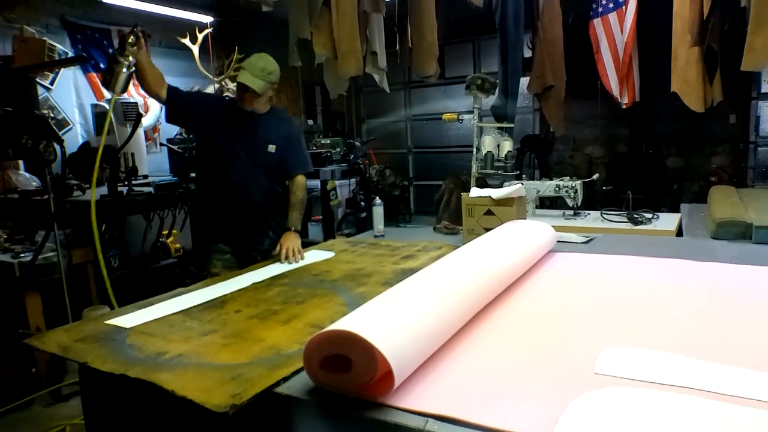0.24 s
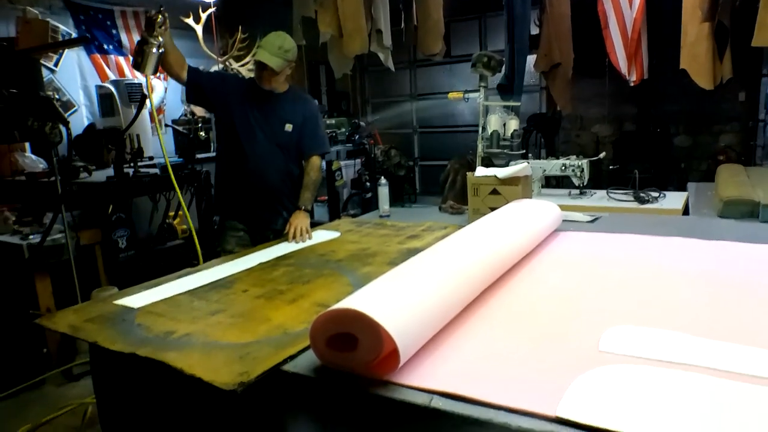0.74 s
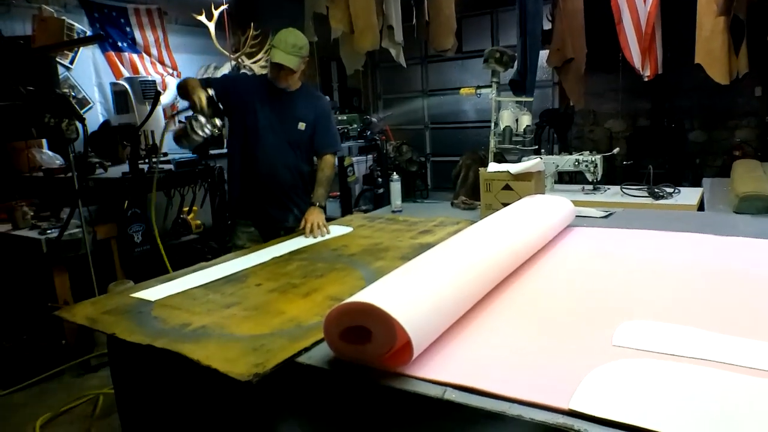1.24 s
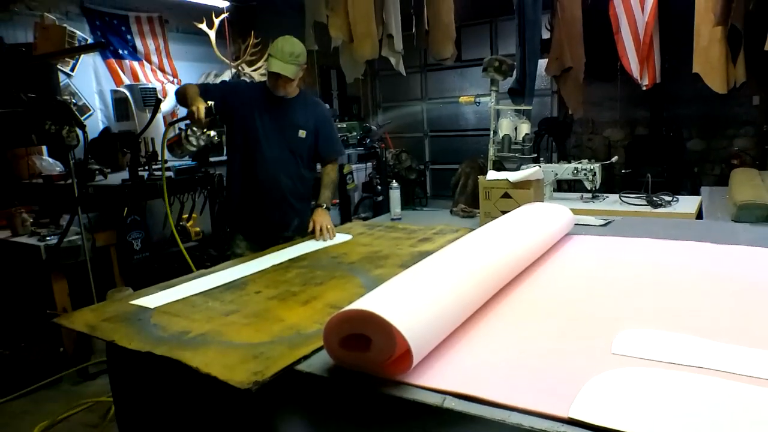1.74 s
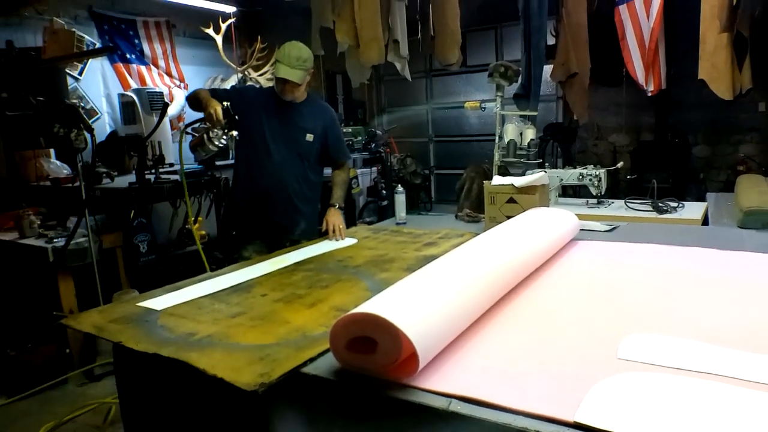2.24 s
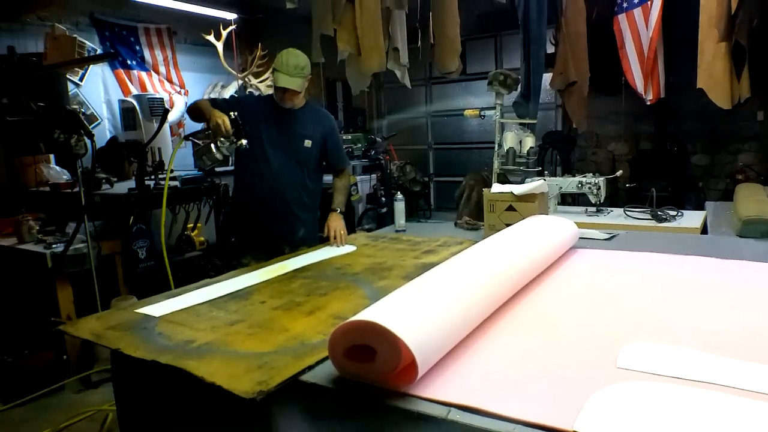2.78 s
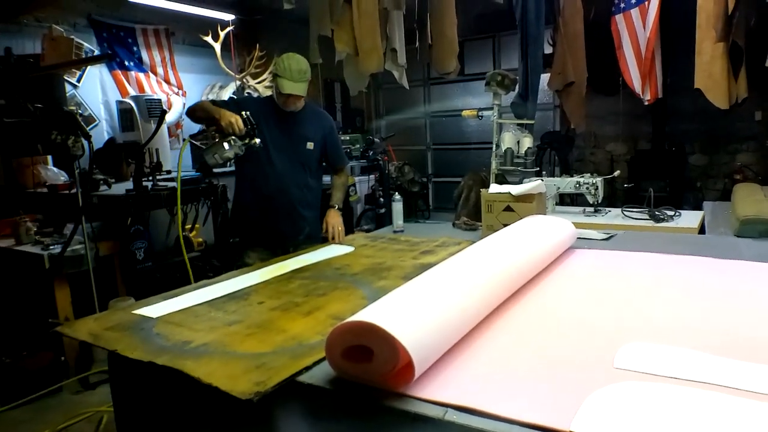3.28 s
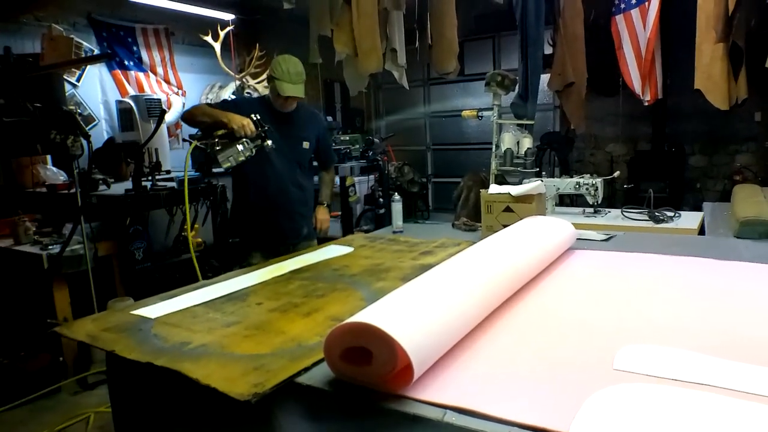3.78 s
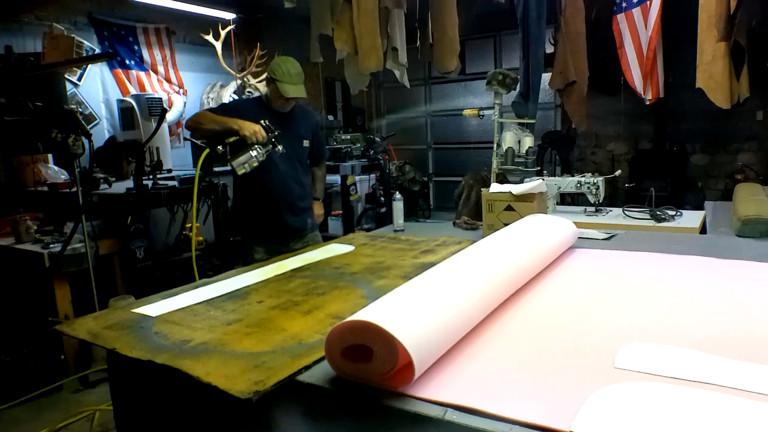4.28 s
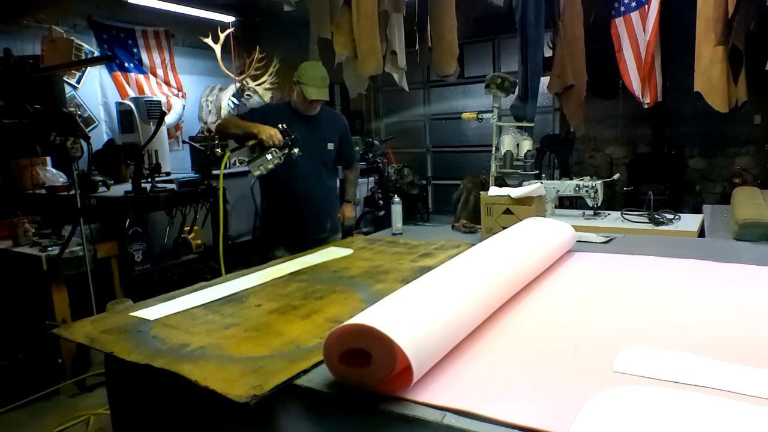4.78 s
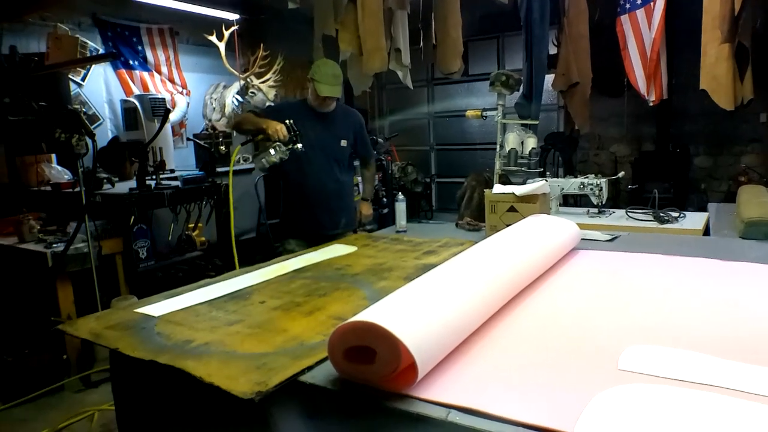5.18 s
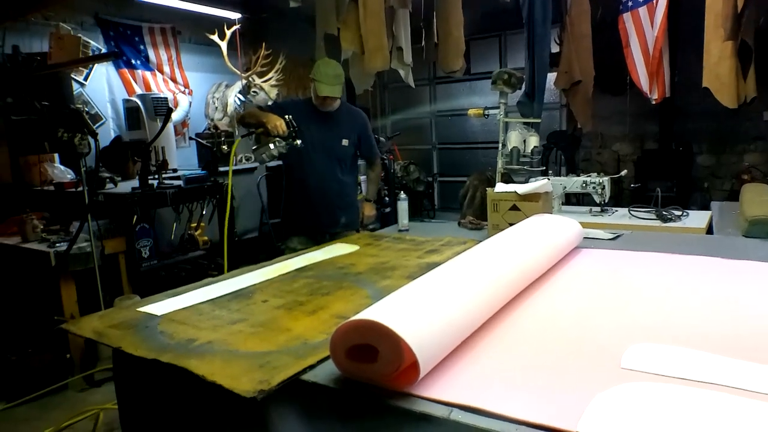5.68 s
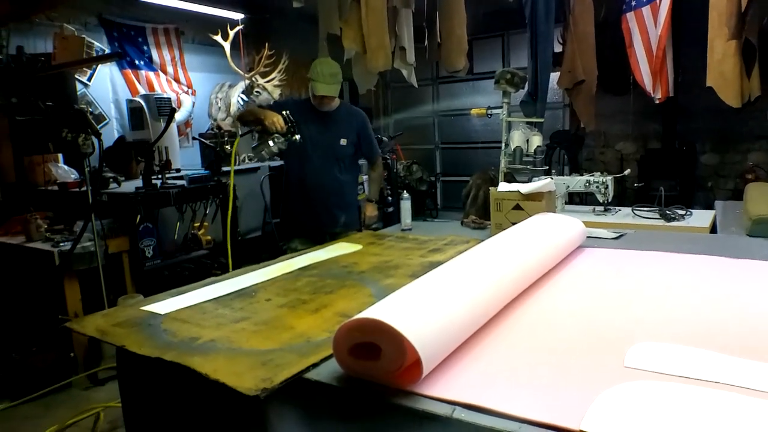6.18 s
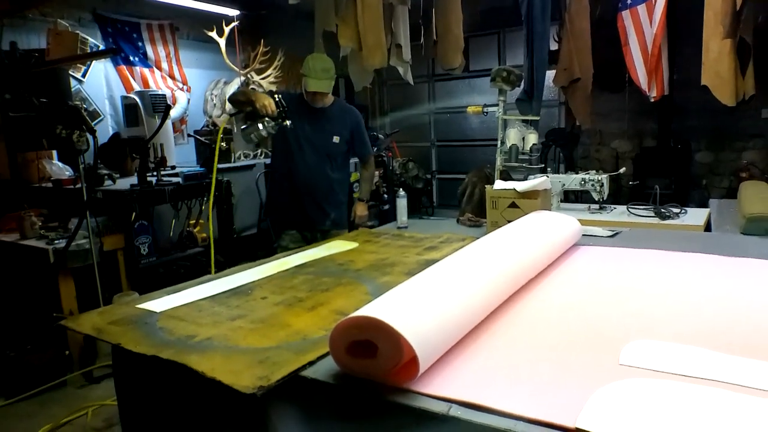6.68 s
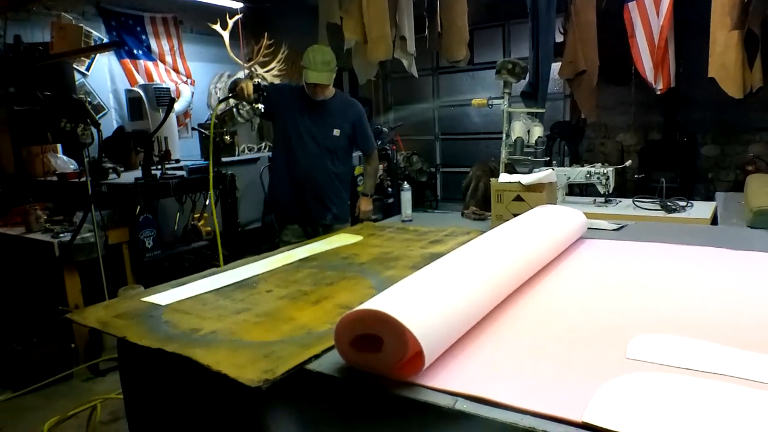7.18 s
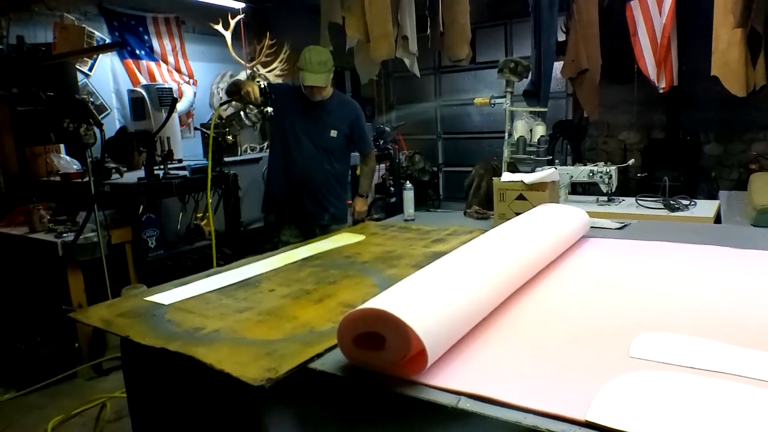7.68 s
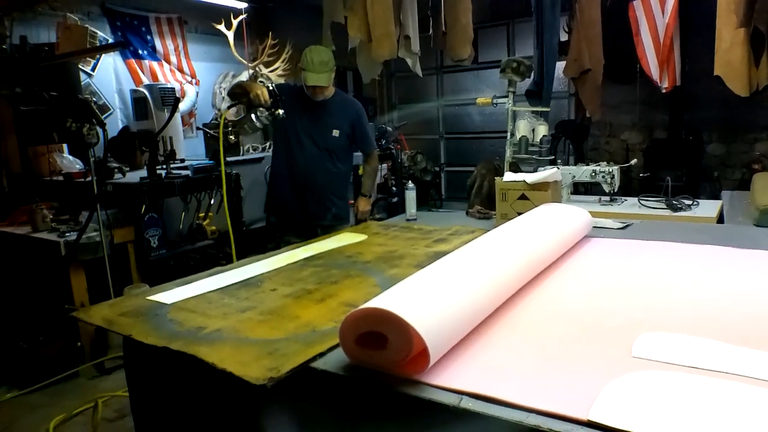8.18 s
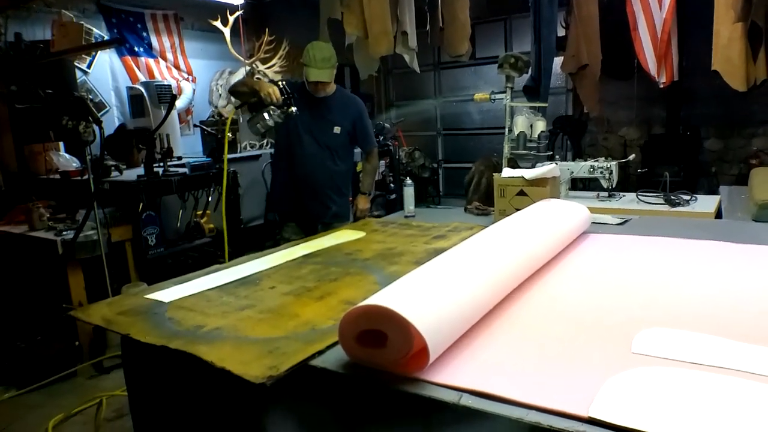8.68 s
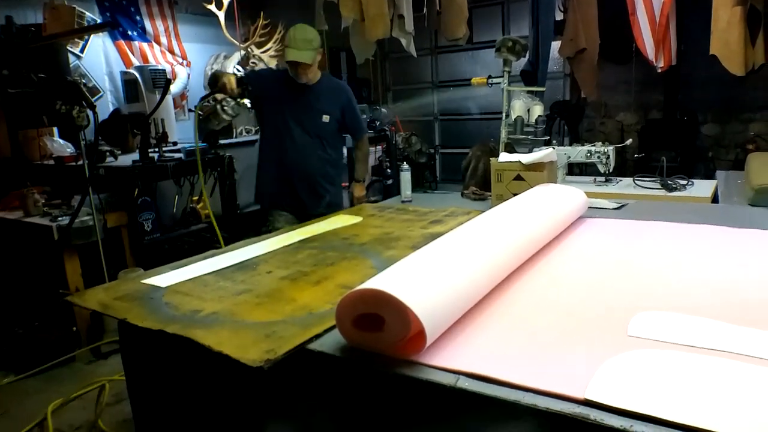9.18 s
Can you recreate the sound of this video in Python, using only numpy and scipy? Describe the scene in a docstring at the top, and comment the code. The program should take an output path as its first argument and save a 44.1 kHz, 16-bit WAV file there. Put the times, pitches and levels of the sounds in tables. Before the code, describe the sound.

A spray gun hisses loudly and steadily over a workbench, following a short stretch of low ventilation hum.

```python
"""A workshop, at the bench, where a compressed-air gun sprays glue along a strip. At first there is only
the ventilation, a low draught and faint handling. Then the nozzle hisses and the jet roars on the bench,
fading off its far end, while nearby surfaces comb the sound as the gun moves and stirred air rumbles.
One small microphone in a resonant housing, within reach of the gusts, is driven to the edge of overload.
The sound has a few brief dropouts, in which thin electronic tones ring."""
import sys
import numpy as np
from scipy import signal
from scipy.fft import rfft, irfft, next_fast_len
from scipy.io import wavfile
from scipy.ndimage import uniform_filter1d, minimum_filter1d

SR = 44100
rng = np.random.default_rng(int(sys.argv[2]) if len(sys.argv) > 2 else 0)


def wrap_up_sound(samples):
    """Save the sound to the file named by the first command line argument, as 16-bit audio."""
    columns = np.atleast_2d(samples).T
    # keep every value between -1 and 1, then stretch to whole-number steps
    tamed = np.clip(columns, -1, 1)
    steps = np.round(tamed * 32767).astype(np.int16)
    wavfile.write(sys.argv[1], SR, steps)


N = 416039
T = np.arange(N) / SR
OPENS_S, OPENING_S = 1.303, .026  # the valve

# Room tone, and the draught on the microphone. Each row: frequency in Hz, relative level in dB.
ROOM_SPECTRUM = [(30, -7), (58, -3), (75, -6), (110, 1.5), (145, 2.5), (215, 3), (270, -6), (380, -16),
                 (620, -18.5), (1050, -23.5), (1400, -33), (2100, -37), (2600, -33), (3300, -41),
                 (12000, -43)]
DRAUGHT_SPECTRUM = [(8, -5), (22, 1), (38, -1), (50, 3), (60, -4), (80, -14.5), (130, -20), (400, -63),
                    (3000, -100)]
# Ventilation hum. Each row: frequency in Hz, level in dB.
FAN_TONES = [(59.2, -59.5), (145.3, -60), (619.1, -83), (796.7, -86)]
# Gusts that reach the microphone. Each row: centre in seconds, half length in seconds, lift in dB.
MIC_GUSTS = [(1.34, 0.03, 16), (3.17, 0.11, 8), (5.95, 0.076, 4), (6.97, 0.027, 14), (8.35, 0.054, 8),
             (8.8, 0.24, 7.5)]
# Rubs and bumps of gun and hose. Each row: centre and half length in seconds, pitch and bandwidth
# in Hz, level in dB.
RUBS = [(.005, .015, 2400, 3000, -64), (.11, .02, 6900, 600, -79), (.24, .04, 1200, 1500, -74),
        (.46, .08, 2500, 4000, -76), (.69, .025, 7000, 700, -79), (.72, .025, 1650, 350, -73),
        (3.35, 0.01, 383, 170, -28.5)]
# The jet on the bench, from low to high. Each row: frequency in Hz, relative level in dB.
DRONE_SPECTRUM = [(25, -19), (60, -4), (90, -7.5), (115, -10.5), (145, -5), (200, -0.5), (245, -8),
                  (280, -24), (450, -11), (2000, -70)]
ROAR_SPECTRUM = [(120, -26), (240, -8), (340, -9), (560, -3.5), (750, 6), (1200, -65), (4000, -60)]
RUSH_SPECTRUM = [(100, -35), (500, -20), (700, -10.5), (830, 1.5), (1300, 1.5), (1900, 1.5), (2400, -4),
                 (4000, -38), (12000, -60)]
# Brief surges of the drone. Each row: centre in seconds, half length in seconds, lift in dB.
DRONE_SURGES = [(1.97, 0.034, 12), (3.68, 0.045, 5)]
# The roar fades off the bench's far end; the rush holds until the jet leaves the edge.
# Each row: time in seconds, relative level in dB.
ROAR_CURVE = [(1.33, -42.0), (1.5, -37.0), (3.35, -36.5), (3.6, -37.5), (5.9, -36), (6.3, -42),
              (6.6, -36.5), (6.9, -45.5), (7.15, -41), (7.5, -50), (7.95, -42), (8.15, -58), (8.55, -44),
              (8.7, -54), (9.42, -42)]
RUSH_CURVE = [(1.33, -26), (1.5, -23), (2.45, -21.5), (3.4, -21.5), (4.4, -23.5), (5.1, -22), (6.35, -25.5),
              (6.6, -19.5), (6.9, -25), (8.0, -23), (8.12, -34.5), (8.3, -28.5), (8.6, -24), (8.75, -34.5),
              (9.42, -28)]
# Resonances of the bench with its surroundings, and of the microphone's housing.
# Each row: centre in Hz, width in Hz, lift in dB.
BENCH_MODES = [(169, 8.1, 1.5), (224, 12, 4.5), (365, 33, 6.5), (453.4, 18, 10.5), (537, 20, 8.5),
               (832, 49, 4.5), (1020, 36, 9.5), (1161, 67, 6.5), (1353, 47, 2.5), (1593, 37, 8)]
HOUSING_MODES = [(937, 24, 22), (1194, 20, 19.5), (1610, 300, 14.5), (2387, 460, 5.5), (2460, 58, 3),
                 (2650, 240, 4), (3530, 350, 4), (3990, 350, -3), (5100, 250, 1.5), (5240, 140, 2),
                 (7310, 120, 6), (7830, 300, 6.5), (9830, 190, 8.5), (9900, 140, -5.5)]
# The free jet at the nozzle, from low to high. Each row: frequency in Hz, relative level in dB.
BODY_SPECTRUM = [(200, -50), (650, -47), (900, -29.5), (1400, -13.5), (1750, -15), (2200, -1.5),
                 (2850, 0.5), (3150, -9.5), (3700, -3), (4400, -21), (8000, -50)]
HISS_SPECTRUM = [(1500, -51), (3000, -8.5), (3900, -7.5), (4350, 1.5), (5400, -0.5), (5700, 0), (6900, -1),
                 (7900, -2), (8300, -5.5), (9000, -17.5), (11000, -10.5), (12000, -67)]
SIZZLE_SPECTRUM = [(6000, -23), (8800, 4.5), (9600, 4.5), (10750, 9.5), (11300, -11), (13000, -40)]
# The free jet's colour turns with the gun. Each row: time in seconds, relative level in dB.
BODY_CURVE = [(1.33, -23), (1.5, -19.5), (3.2, -17), (3.65, -21), (5.0, -20.5), (7.0, -19), (7.5, -16.5),
              (8.0, -18.5), (8.15, -21.0), (8.4, -17.5), (9.42, -20.0)]
SIZZLE_CURVE = [(1.33, -20.5), (1.7, -21.0), (2.5, -20.0), (4.3, -23), (6.2, -22.5), (7.0, -22),
                (7.25, -17.5), (7.55, -22.5), (7.8, -19), (8.1, -22.5), (9.0, -21.0), (9.3, -18.0)]
# Brief dropouts in the sound. Each row: centre and half length in seconds, depth in dB.
DROPOUTS = [(1.756, .013, -26), (1.873, .005, -13), (1.915, .005, -11), (2.535, .006, -13),
            (3.067, .006, -13), (4.304, .007, -15), (5.605, .007, -15), (8.102, .007, -13)]
# Thin electronic tones that ring in a dropout. Each row: frequency in Hz, relative level in dB.
DROPOUT_TONES = [(1080, -14.5), (2450, 3), (2740, -3.5), (4400, 2.5), (5150, 8), (5660, -4), (6480, -20),
                 (7100, 0.5), (7790, 6), (9800, -2)]


def undb(db):
    """Decibels to gain."""
    return 10 ** (np.asarray(db) / 20)


def unit(x):
    """Scale to rms 1."""
    return x / np.std(x)


def curve(table):
    """A table's levels, joined by straight lines in time."""
    times, db = np.transpose(table)
    return np.interp(T, np.sort(times), db)


def swell(s, half):
    """A smooth rise and fall around time s, top 1."""
    return np.exp(-((T - s) / half) ** 2 / 2)


def lifts(table):
    """The dB that a table of swells adds over time."""
    return sum(db * swell(s, half) for s, half, db in table)


def walk(rate):
    """Random levels held 1 / rate seconds and smoothed twice; spread 1."""
    hold = int(SR / rate)
    held = np.repeat(rng.standard_normal(1024), hold)[:N]
    return unit(uniform_filter1d(uniform_filter1d(held, hold), hold))


def noise(spectrum, peaks=()):
    """Turbulence with a smooth spectrum, lifted at each resonance; rms 1."""
    size = next_fast_len(N, True)
    hz = np.maximum(np.arange(size // 2 + 1) * SR / size, 1)
    points, db = np.transpose(spectrum)
    shape_db = np.interp(np.log(hz), np.log(points), db)
    for centre, width, lift in peaks:
        shape_db += lift / (1 + (2 * (hz - centre) / width) ** 2)
    white = rfft(rng.standard_normal(size))
    return unit(irfft(white * undb(shape_db), size)[:N])


def lowpass(x, hz):
    """A steep cut of the top."""
    return signal.sosfilt(signal.ellip(10, .2, 70, hz, fs=SR, output="sos"), x)


def reflections(x, gain, shortest_s, longest_s, sway_s, count):
    """Echoes off bench and clutter; their paths change as the gun moves, so the comb slides."""
    out = x
    for lag in np.geomspace(shortest_s, longest_s, count):
        out = out + gain * np.interp(T - lag - sway_s * walk(.7), T, x)
    return out / np.sqrt(1 + count * gain ** 2)


def ventilation(room_db=-53, waver_db=2.5, drift_rad=.49, fade_end_s=.73, fade_s=.2):
    """Room tone: air noise and wavering fan tones, one of which dies away before the spraying."""
    def tone(hz, db):
        level = np.sqrt(2) * undb(db + waver_db * walk(4.5))
        return level * np.sin(2 * np.pi * hz * T + drift_rad * walk(6.6))
    fading = tone(hz=619, db=-73) * np.clip((fade_end_s - T) / fade_s, 0, 1)
    air = noise(ROOM_SPECTRUM) * undb(room_db)
    return air + sum(tone(hz, db) for hz, db in FAN_TONES) + fading


def draught(still_db=-50.5, stirred_db=-51, build_db_per_s=1.13, puff_db=4):
    """Air rumbles on the microphone in puffs and gusts, building for as long as the gun blows."""
    db = np.where(T < OPENS_S, still_db, stirred_db + build_db_per_s * (T - OPENS_S))
    return noise(DRAUGHT_SPECTRUM) * undb(db + lifts(MIC_GUSTS) + puff_db * walk(25))


def handling():
    """Gun and hose in the hand: each rub or bump is a band of noise that swells and dies away."""
    out = np.zeros(N)
    for s, half, hz, width, db in RUBS:
        b, a = signal.iirpeak(hz, hz / width, fs=SR)
        band = signal.lfilter(b, a, signal.lfilter(b, a, rng.standard_normal(N)))
        out += unit(band) * undb(db) * swell(s, half)
    return out


def dropouts(x, ring_db=-11, scatter=.03, uneven_db=3):
    """Brief dropouts in the sound: the hiss cuts out and thin electronic tones ring, never twice alike."""
    hz, db = np.transpose(DROPOUT_TONES)
    out = x.copy()
    for s, half, depth_db in DROPOUTS:
        near = np.abs(T - s) < .06
        kept = undb(depth_db * swell(s, half)[near])
        ring_fade = np.sqrt(1 - kept ** 2)  # the tones rise as the sound drops out
        detune, strength, phase = rng.standard_normal((3, len(hz)))
        cycles = np.outer(T[near] - s, hz * (1 + scatter * detune)) + phase
        ring = unit(np.sin(2 * np.pi * cycles) @ undb(db + uneven_db * strength))
        out[near] = kept * out[near] + ring_fade * ring * undb(ring_db)
    return out


def wandering_modes(x, wander_db=5, steadier_above_hz=600):
    """Each bench resonance swells and fades on its own as the jet moves over it, the low ones most."""
    for hz, width, _ in BENCH_MODES:
        b, a = signal.iirpeak(hz, hz / width / 2, fs=SR)
        db = wander_db * min(1, steadier_above_hz / hz) * np.tanh(walk(11))
        x = x + signal.lfilter(b, a, x) * (undb(db) - 1)
    return x


def jet_on_bench(spot_s=2.96, approach_db_per_s=11.5, leave_db_per_s=4.5):
    """The jet breaks on the bench into larger, lower eddies; the drone peaks as it crosses one spot."""
    def eddies(spectrum, db, flutter_db):
        return noise(spectrum, BENCH_MODES) * undb(db + flutter_db * walk(18))
    off_spot_db = np.maximum(approach_db_per_s * (spot_s - T), leave_db_per_s * (T - spot_s))
    rush = eddies(RUSH_SPECTRUM, curve(RUSH_CURVE), flutter_db=1.5)
    roar = eddies(ROAR_SPECTRUM, curve(ROAR_CURVE) + 1, flutter_db=1.5)
    drone = eddies(DRONE_SPECTRUM, -39 - off_spot_db + lifts(DRONE_SURGES), flutter_db=2.5)
    bench = wandering_modes(rush + roar + drone)
    return reflections(bench, gain=.18, shortest_s=.023, longest_s=.06, sway_s=.00052, count=4)


def nozzle():
    """The free jet: three bands of turbulence, each fluttering, coloured by the microphone's housing."""
    def band(spectrum, db, flutter_db):
        return noise(spectrum, HOUSING_MODES) * undb(db + flutter_db * walk(20))
    hiss = band(HISS_SPECTRUM, db=-11, flutter_db=.52)
    body = band(BODY_SPECTRUM, curve(BODY_CURVE) + 1.12, flutter_db=1.05)
    sizzle = band(SIZZLE_SPECTRUM, curve(SIZZLE_CURVE) + .9, flutter_db=.3)
    jet = hiss + body + sizzle
    return reflections(jet, gain=.2, shortest_s=.004, longest_s=.019, sway_s=.0001316, count=6)


def valve(spurt_db=.7, spurt_s=.65):
    """The valve opens along an S-curve and stays open; pressure stored in the hose gives a first spurt."""
    opening = np.clip((T - OPENS_S) / OPENING_S, 0, 1)
    spurt = np.exp(-np.maximum(T - OPENS_S - OPENING_S, 0) / spurt_s)
    return np.sin(np.pi / 2 * opening) ** 3 * undb(spurt_db * spurt)


def scene():
    """The spray over the workshop's background, from one microphone, the same on both channels."""
    spray = valve() * dropouts(nozzle() + jet_on_bench())
    mono = spray + handling() + ventilation() + draught()
    return np.array([mono, mono])


def record(dry):
    """The microphone loses the top; a fast limiter holds the peaks, whose tips clip with a faint grit."""
    narrow = lowpass(dry, hz=11180)
    gain = 1 / np.maximum(np.abs(narrow), 1)
    gain = uniform_filter1d(minimum_filter1d(gain, size=9), size=9)
    clipped = np.clip(narrow * gain, -.9, .9)
    return lowpass(clipped, hz=15900)


dry = scene()
out = record(dry)
wrap_up_sound(out)
```